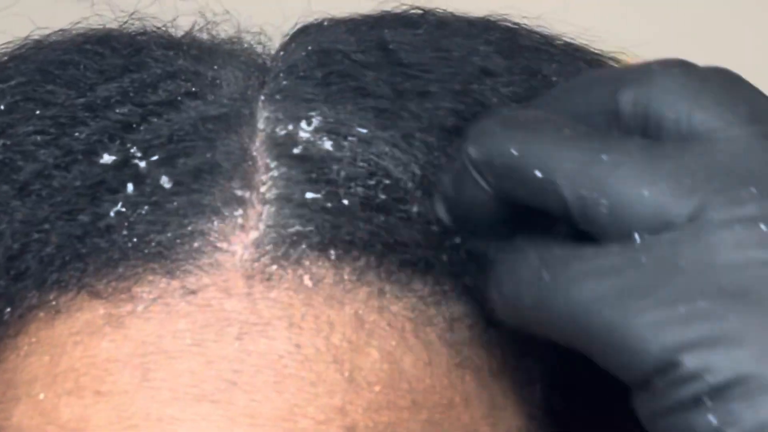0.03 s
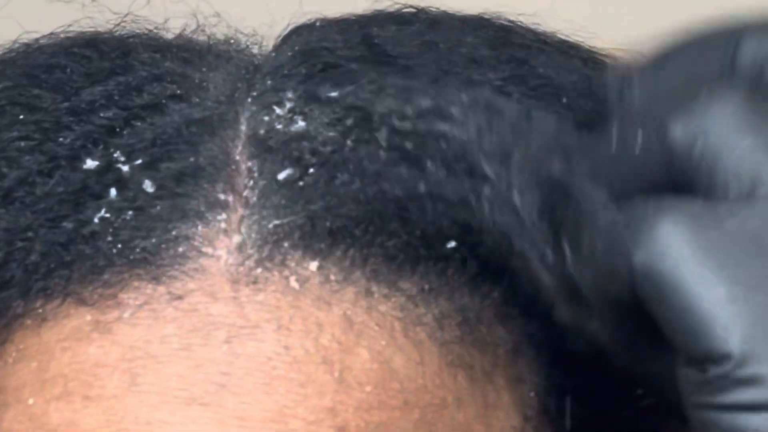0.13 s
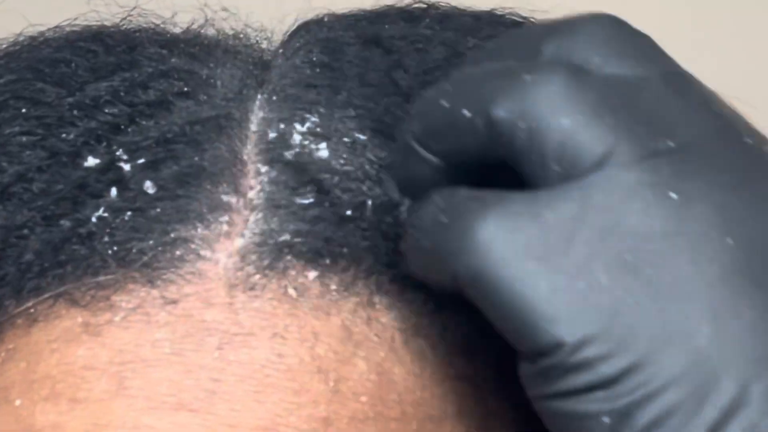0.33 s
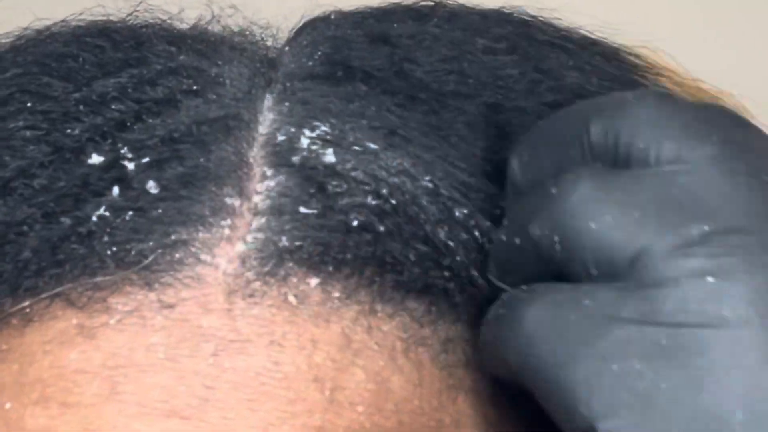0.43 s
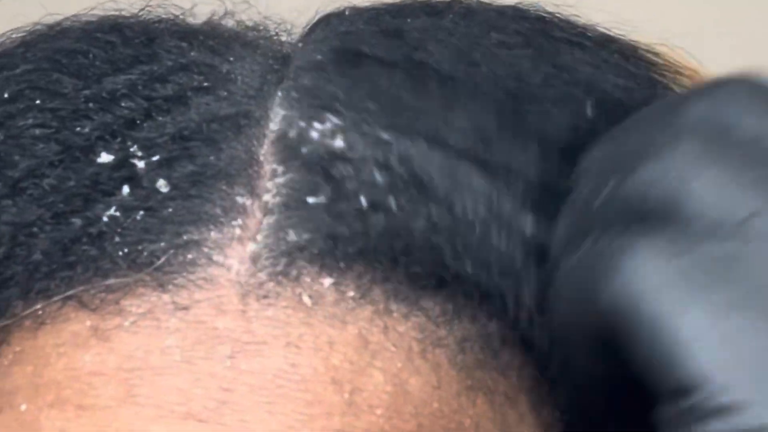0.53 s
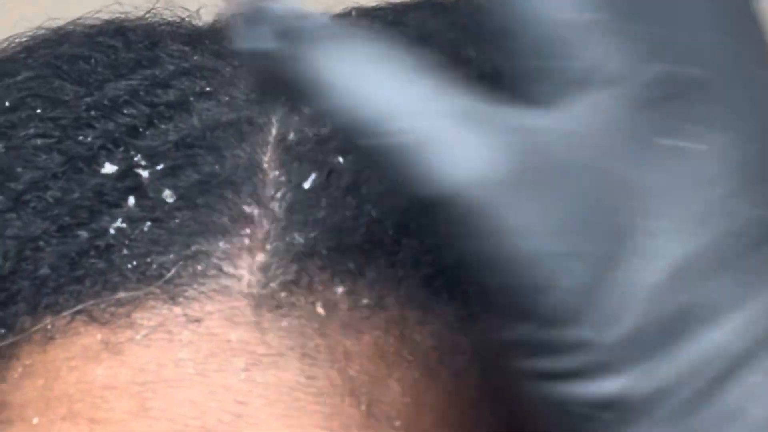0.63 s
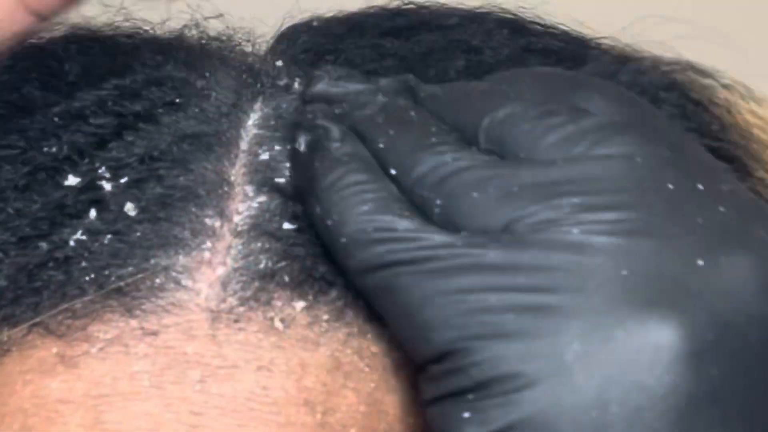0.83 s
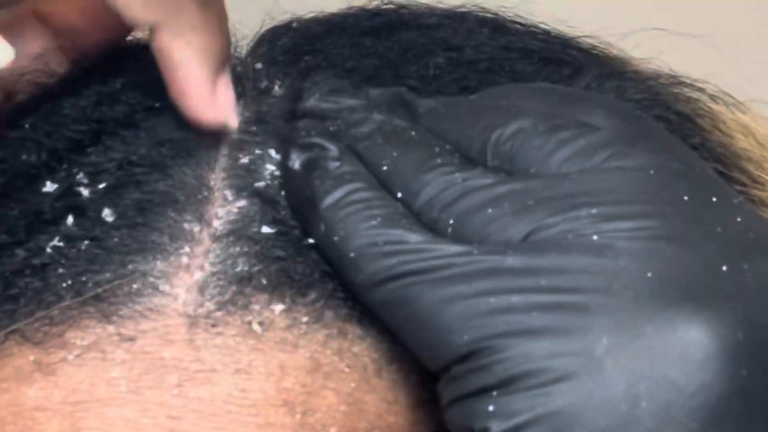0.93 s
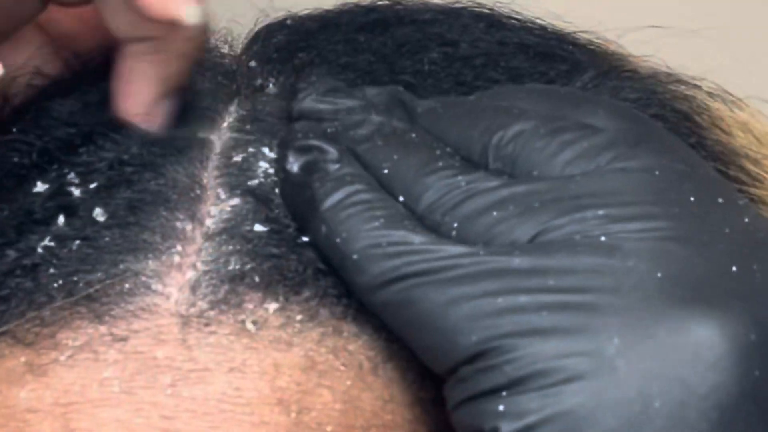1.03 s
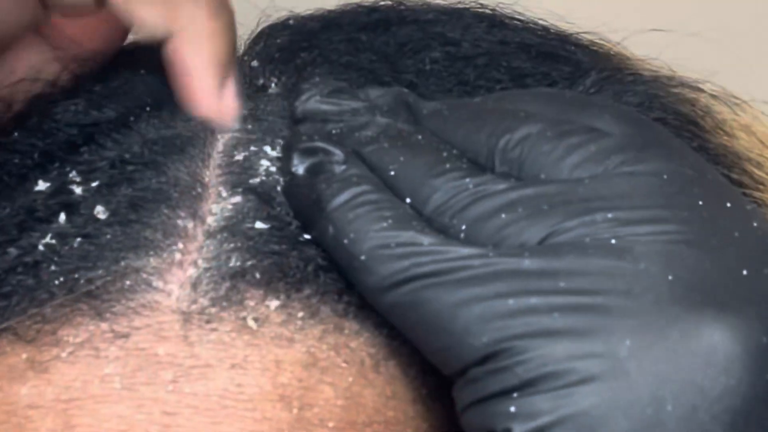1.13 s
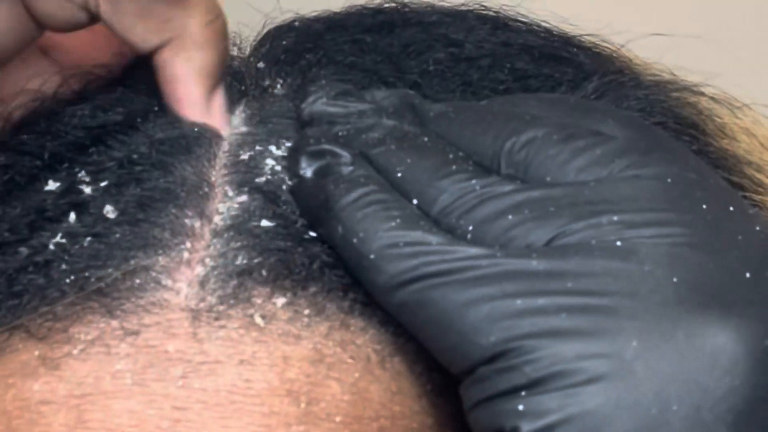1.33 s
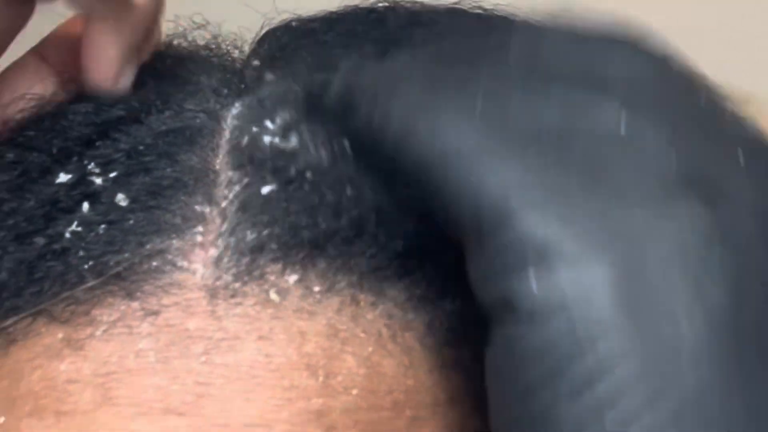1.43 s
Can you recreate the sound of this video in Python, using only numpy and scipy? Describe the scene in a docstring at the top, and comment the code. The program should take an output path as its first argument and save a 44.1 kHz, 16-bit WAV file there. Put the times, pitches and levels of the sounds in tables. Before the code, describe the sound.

Gloved fingers brush dry hair close up in short, bright, hissy strokes; a small hollow object knocks and rattles early, then softer rubbing fades into sparse crackles. Small quiet room, close stereo microphones, faint low hum.

```python
"""Gloved fingers brush dry hair close to two microphones: tiny random slips over hiss, shaped by each stroke.
Click bursts crackle as hair catches on the glove; brief tones make hairs snap and fingertips pat.
Once a small hollow object knocks and rattles nearby: ringing modes, dry noise cracks and a low thump.
The quiet room adds short dense reflections, a drifting noise tone and a low wavering hum."""
import sys
import numpy as np
from scipy import signal
from scipy.fft import rfft, irfft
from scipy.io import wavfile
from scipy.ndimage import uniform_filter1d

SR = 44100
rng = np.random.default_rng(int(sys.argv[2]) if len(sys.argv) > 2 else 0)


def dump_mix(stems):
    """Bounce the given channels to the path in sys.argv[1] as a 16-bit WAV at rate SR."""
    frames = np.atleast_2d(stems).T  # one column per channel
    limited = np.clip(frames, -1, 1)  # hard clip at full scale
    pcm = np.round(limited * 32767).astype(np.int16)
    wavfile.write(sys.argv[1], SR, pcm)


def nominal_scale(level):
    """Amplitude ratio for a level in decibels (scalar or array-like)."""
    x = np.asarray(level, float) / 20
    return 10 ** x


N = 66150
SIDES = np.array([[.5], [-.5]])  # left and right halves of any stereo difference


def evened(x):
    """Scales to rms 1."""
    return x / np.sqrt(np.mean(x ** 2) + 1e-20)


def read(points, hz):
    """Reads a table on a log-frequency axis."""
    f, value = np.transpose(points)
    return np.interp(np.log(hz + 1), np.log(f + 1), value)


def add(mix, s, sound):
    """Mixes a sound in at time s."""
    part = mix[..., round(s * SR):][..., :sound.shape[-1]]
    part += sound[..., :part.shape[-1]]


def coloured(x, gain):
    """Filters by a gain given as a function of frequency."""
    return irfft(rfft(x) * gain(np.fft.rfftfreq(x.shape[-1], 1 / SR)), x.shape[-1])


def pair(x, left_lag_s, pan_db):
    """One source reaches the two microphones at slightly different times and levels."""
    both = coloured(x, lambda hz: np.exp(-2j * np.pi * hz * SIDES * left_lag_s))
    return both * nominal_scale(SIDES * pan_db)


def clicks(length, per_s, spread_db):
    """Random clicks of random sign, a few of them large."""
    chance = rng.random(length)
    size = np.minimum(rng.exponential(1, length), 4)
    sign = np.sign(rng.standard_normal(length))
    return evened((chance < per_s / SR) * nominal_scale(spread_db * size) * sign)


def blip(hz, cycles):
    """A short tone with a quick start that dies within a few cycles."""
    u = np.arange(round(4 * cycles / hz * SR)) * hz / SR
    envelope = np.exp(1 - 3 * u / cycles) * 3 * u / cycles
    return np.sin(2 * np.pi * u) * envelope


# decay of the reflections: f/Hz, t60/s
WALL_DECAY = [(200, .2), (600, .12), (1150, .16), (2200, .15), (3800, .1), (8000, .08)]
# left-right likeness of reflections and room tone: f/Hz, correlation (-1 to 1)
ROOM_LIKENESS = [(30, .75), (100, .85), (250, .75), (600, .35), (1500, -.15), (5000, -.1), (14000, .2)]


def likeness(hz):
    """Left-right correlation of diffuse room sound at each frequency."""
    return np.clip(read(ROOM_LIKENESS, hz), -1, 1)


def walls(x):
    """Dense reflections, alike on both sides in the bass, each band dying at its own speed."""
    left, other = rng.standard_normal((2, SR // 3))
    right = coloured(left, likeness) + coloured(other, lambda hz: np.sqrt(1 - likeness(hz) ** 2))
    hz, t, z = signal.stft(np.array([left, right]), SR, nperseg=256)
    decay = nominal_scale(-60 * t / read(WALL_DECAY, hz)[:, None])
    tail = signal.istft(z * decay, SR, nperseg=256)[1]
    # silent for the first 2.4 ms, full by 10.4 ms
    tail = tail * np.clip(np.arange(tail.shape[1]) / SR / .008 - .3, 0, 1)
    tail = tail / np.linalg.norm(tail[0])
    return signal.fftconvolve(x[None], tail, axes=1)[:, :len(x)]


AIR_DB, AIR_TOP_HZ = -68, 14340  # rms before panning; the room tone dulls above AIR_TOP_HZ
AIR_PAN_DB, PATCH_DB = -1.4, 1.  # left over right; rms depth of the drifting patches
# spectral shape of the room tone: f/Hz, relative level/dB per Hz
AIR_SHAPE = [(15, -74), (25, -36), (43, -38.5), (87, -16.5), (131, -3), (207, -5.5), (366, -17.5),
             (480, -17), (581, -20), (684, -23), (1770, -29.5), (2080, -34.5), (4210, -37.5),
             (16300, -44.5)]
# wavering low hum: f/Hz, level/dB (rms before panning), width/Hz
HUM_BANDS = [(117.8, -73.5, 2.9), (197, -83.5, 14)]


def air():
    """Room tone as noise with drifting patches, and narrow noise bands as a low hum that wavers."""
    frames, hz = N // 512 + 5, np.fft.rfftfreq(2048, 1 / SR)
    a, b, c, d, patches = rng.standard_normal((frames, 1025, 5)).T
    patches = uniform_filter1d(patches, size=8, axis=0)  # across frequency
    patches = evened(uniform_filter1d(patches, size=5, axis=1))  # across time
    same = likeness(hz)[:, None]
    left = a + 1j * b
    right = same * left + np.sqrt(1 - same ** 2) * (c + 1j * d)
    z = np.array([left, right]) * nominal_scale(PATCH_DB * patches)

    def tone(gain):
        return evened(signal.istft(z * gain[:, None], nperseg=2048, noverlap=1536)[1][:, :N])

    hum = sum(nominal_scale(db) * tone(1 / (1 + (2 * (hz - f) / width) ** 2)) for f, db, width in HUM_BANDS)
    room = nominal_scale(AIR_DB) * tone(nominal_scale(read(AIR_SHAPE, hz)) / (1 + (hz / AIR_TOP_HZ) ** 20))
    return (room + hum) * nominal_scale(SIDES * AIR_PAN_DB)


HARD_FROM_HZ, HEAVY_BELOW_HZ = 2500, 900  # where the upper modes begin and the lower modes end
KNOCK_RISE_CYCLES, KNOCK_PAN_DB = 1.6, -2.5
CRACK_DB, CRACK_T60_S, CRACK_LOW_HZ, CRACK_TOP_HZ = -27.5, 0.069, 2500, 7000  # before blow strength
# modes of the hollow object: f/Hz, level/dB before blow strength, t60/s, left lead/rad
SHELL_MODES = [(450, -18, .022, .2), (650, -9, .016, .15), (830, -18, .035, .3), (980, -4, .012, 1.2),
               (1130, -33, .14, 1.6), (1170, 0, .012, 1.7), (1950, -24, .02, 2.2), (2300, -27, .014, 1.4),
               (2900, -23, .008, 1.4), (3590, -14, .007, 1.4), (4050, -15, .007, 1.4)]


def ring(hard_db, heavy_db):
    """The modes of the hollow object after one blow, with a dry crack on top."""
    t = np.arange(8000) / SR
    modes = 0
    for hz, db, t60, lead in SHELL_MODES:
        db = db + hard_db * (hz > HARD_FROM_HZ) + heavy_db * (hz < HEAVY_BELOW_HZ)
        rise = (1 - np.exp(-t * hz / KNOCK_RISE_CYCLES)) ** 2
        modes = modes + nominal_scale(db - 60 * t / t60) * np.sin(2 * np.pi * hz * t + SIDES * lead) * rise
    crack = coloured(rng.standard_normal((2, 8000)),
                     lambda hz: 1 / (1 + (CRACK_LOW_HZ / (hz + 1)) ** 4) / (1 + hz / CRACK_TOP_HZ))
    crack = nominal_scale(CRACK_DB + hard_db - 60 * t / CRACK_T60_S) * crack
    return (modes + crack) * nominal_scale(SIDES * KNOCK_PAN_DB)


SHELL_LOW_HZ, WALLS_DB = 352, -16  # a small object radiates little below SHELL_LOW_HZ
EARLIER_KNOCK = (-0.016, -19, 0, 5)  # just before the start, so only its ring is heard; columns as below
THUMP_S, THUMP_DB, THUMP_HZ, THUMP_CYCLES = .218, -51.5, 190, 7.  # the surface swells in late and low
# the object grazes, lands and bounces: t/s, strength/dB, upper-mode hardness/dB, lower-mode weight/dB
BLOWS = [(.1783, -43, 8, -3), (.1860, -44, -10, 0), (.1935, -37, -20, -6), (.2014, -5.5, -4, -2),
         (.2040, -18, -8, 5), (.2086, -19, -10, -6), (.2115, -21, -10, -6), (.2149, -8, -11, -8),
         (.2188, -24, -10, 5), (.2223, -15, 2, 2), (.2283, -10.5, -17, -6), (.2330, -23, -10, -3),
         (.2358, -23, -4, -3), (.2422, -24, -11, -8), (.2485, -28, -11, -8)]


def knocks():
    """The object lands and bounces, the surface underneath thumps, and the room answers."""
    lead = SR // 10  # head room for the earlier knock
    x = np.zeros((2, N + lead))
    for s, db, hard_db, heavy_db in [*BLOWS, EARLIER_KNOCK]:
        add(x, s + lead / SR, nominal_scale(db) * ring(hard_db, heavy_db))
    x = signal.sosfilt(signal.butter(4, SHELL_LOW_HZ, "high", fs=SR, output="sos"), x)
    add(x, THUMP_S + lead / SR, nominal_scale(THUMP_DB) * blip(THUMP_HZ, THUMP_CYCLES))
    return (x + nominal_scale(WALLS_DB) * walls(x[1]))[:, lead:]


HAIR_LAG_S, HAIR_PAN_DB = 1e-4, -2.5  # left lag; left level over right
CRACKLE_SPREAD_DB, CRACKLES_PER_S, CRACKLE_LOW_HZ = 3., 5000, 1800
SNAP_CYCLES, PAT_CYCLES, NEAR_WALLS_DB = 3., 1.4, -9.5
# hair catching on the glove: t/s, level/dB (rms before the fade), fade length/s, brightness/dB per octave
CATCHES = [(0.53, -65, 0.0073, 5), (0.553, -68, 0.028, -25), (0.674, -64, 0.014, 1.5),
           (1.032, -74.5, .02, 3), (1.058, -70.5, 0.0058, 6), (1.191, -74.5, 0.028, -3),
           (1.209, -63.5, 0.016, -3), (1.332, -62, 0.0086, 12), (1.352, -74, 0.031, -4.5),
           (1.381, -59.5, 0.016, -4), (1.392, -65.5, 0.021, -1), (1.424, -60.5, 0.0066, 3.5),
           (1.449, -67.5, 0.026, -11)]
# single hairs snapping: t/s, envelope peak level/dB before panning, f/Hz
HAIR_SNAPS = [(.0623, -46, 10000), (.0678, -42, 10500), (.4612, -54, 10500), (.5258, -52, 8600),
              (1.2102, -55, 9000), (1.3825, -50, 9000), (1.4527, -39, 7700)]
# soft pats of a fingertip: t/s, envelope peak level/dB before panning, f/Hz
FINGER_PATS = [(.134, -57, 676), (.797, -57.5, 464), (1.393, -63, 294), (1.4533, -55.5, 540),
               (1.458, -56, 223), (1.461, -68, 880)]


def crackles():
    """Bursts of clicks and noise that start at once and fade, with single snaps and soft pats."""
    out = np.zeros((2, N))
    t = np.arange(2048) / SR
    for s, db, length, tilt_db in CATCHES:
        burst = np.array([clicks(2048, CRACKLES_PER_S, CRACKLE_SPREAD_DB) + rng.standard_normal(2048)
                          for _ in range(2)])
        burst = coloured(burst, lambda hz: nominal_scale(tilt_db * np.log2((hz + 1) / 6000))
                         / (1 + (CRACKLE_LOW_HZ / (hz + 1)) ** 4))
        envelope = np.exp(-(t / length) ** 2) * np.minimum(t / 0.0015, 1)
        add(out, s, nominal_scale(db) * evened(burst) * envelope)
    near = np.zeros(N)
    for s, db, hz in HAIR_SNAPS:
        add(near, s, nominal_scale(db) * blip(hz, SNAP_CYCLES))
    for s, db, hz in FINGER_PATS:
        add(near, s, nominal_scale(db) * blip(hz, PAT_CYCLES))
    return out + pair(near, HAIR_LAG_S, HAIR_PAN_DB) + nominal_scale(NEAR_WALLS_DB) * walls(near)


HAIRS_PER_S, HAIR_SPREAD_DB = 4700, 2.5
SMOOTH_SHARE, HAIR_SAME = 0.33, 0.87  # hiss share of the power; part common to both sides
FLUTTER_DB, RUSTLE_DB, BRIGHT_FROM_HZ = 0.92, 3, 8450  # rms flutter; overall lift; treble split
# glove pressure, one list a stroke: t/s, level/dB before the overall lift, treble over the rest/dB
STROKES = [
    [(0, -66, 27), (.008, -60, 5.5), (.054, -62, 9), (.066, -54, 6), (.1, -63.5, 10), (.124, -71, -5),
     (.195, -75, -3)],
    [(.255, -75, -15), (.285, -68.5, -7.5), (.32, -59, 11), (.356, -63.5, 7), (.38, -60, 7.5),
     (.396, -56.5, 2), (.415, -61.5, 4.5), (.434, -67, -6), (.45, -71.5, 9), (.49, -73, -2.5),
     (.52, -68.5, 7)],
    [(.524, -62.5, 3.5), (.6, -71, -5.5), (.66, -73.5, 7), (.684, -69, -3.5), (.742, -70, -1),
     (.88, -80, 5.5), (.94, -88.5, 4), (1.0, -100, 3.5)],
    [(1.4, -89, 8), (1.43, -77, 8), (1.45, -62, -3), (1.472, -68, 8.5), (1.5, -62, 3)],
]
# spectral shape of hair under the glove: f/Hz, relative level/dB per Hz
HAIR_SHAPE = [(880, -15.5), (1500, -16), (2370, -7.5), (4150, -6), (8280, -1.5), (9710, -3), (12100, -3),
              (14800, -5), (15700, 2), (16300, -40)]


def hair_slips():
    """Tiny separate slips mixed with a smooth hiss."""
    hiss = rng.standard_normal(N)
    slips = clicks(N, HAIRS_PER_S, HAIR_SPREAD_DB)
    return np.sqrt(SMOOTH_SHARE) * hiss + np.sqrt(1 - SMOOTH_SHARE) * slips


def rustle():
    """Thousands of hair slips over hiss, following the pressure and brightness of each stroke."""
    t = np.arange(N) / SR
    level = sum(nominal_scale(np.interp(t, *np.transpose(s)[:2], left=-140, right=-140)) for s in STROKES)
    bright_db = np.interp(t, *np.concatenate(STROKES).T[::2])
    flutter = uniform_filter1d(rng.standard_normal(N), size=300)
    flutter = evened(uniform_filter1d(flutter, size=300))
    common = pair(hair_slips(), HAIR_LAG_S, HAIR_PAN_DB)
    separate = np.array([hair_slips(), hair_slips()])
    both = HAIR_SAME * common + np.sqrt(1 - HAIR_SAME ** 2) * separate
    both = evened(coloured(both, lambda hz: nominal_scale(read(HAIR_SHAPE, hz))))
    low = coloured(both, lambda hz: 1 / (1 + (hz / BRIGHT_FROM_HZ) ** 6))
    tilt = nominal_scale(bright_db / 2)  # half the contrast lifts the treble, half lowers the rest
    brushed = low / tilt + (both - low) * tilt
    return brushed * level * nominal_scale(RUSTLE_DB + FLUTTER_DB * flutter)


def scene():
    """All sources at the two microphones."""
    return air() + knocks() + crackles() + rustle()


def band_limit(x):
    """A steep low-pass at the top of the band."""
    return signal.sosfilt(signal.butter(12, 16470, fs=SR, output="sos"), x)


def record(dry):
    """The microphones' steep upper limit at 15.7 kHz."""
    mix = coloured(dry, lambda hz: 1 / (1 + (hz / 15700) ** 40))
    return band_limit(mix)


dry = scene()
out = record(dry)
dump_mix(out)
```